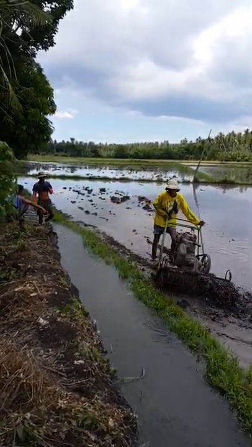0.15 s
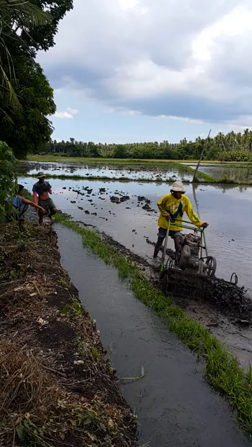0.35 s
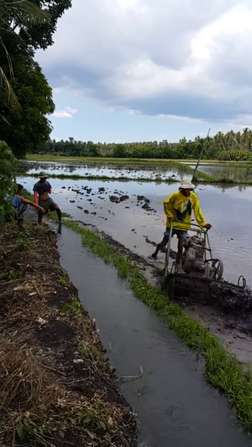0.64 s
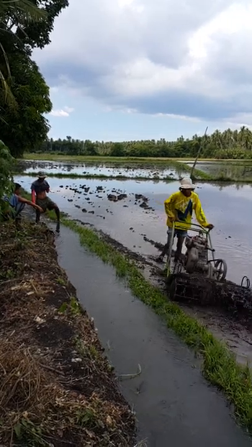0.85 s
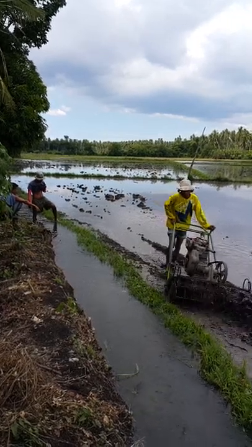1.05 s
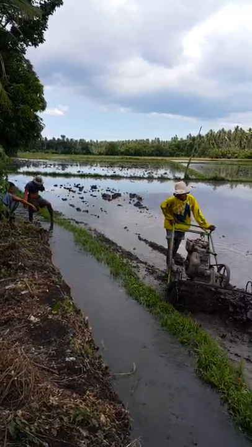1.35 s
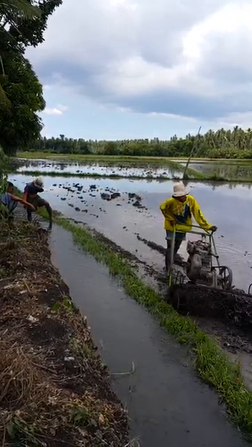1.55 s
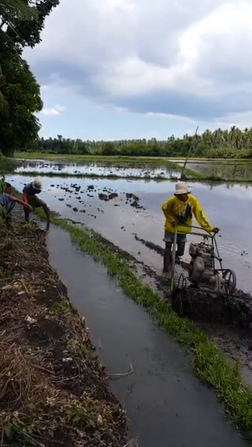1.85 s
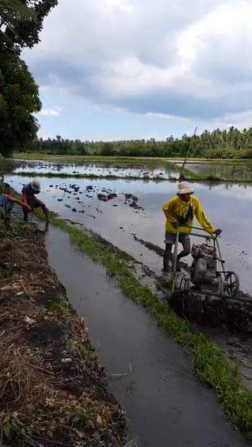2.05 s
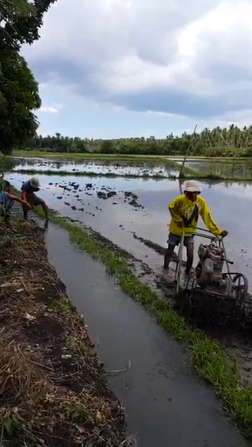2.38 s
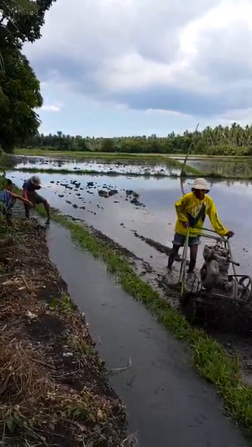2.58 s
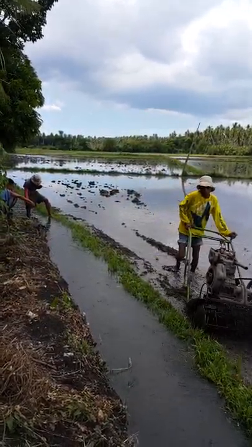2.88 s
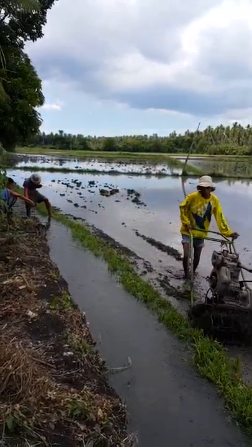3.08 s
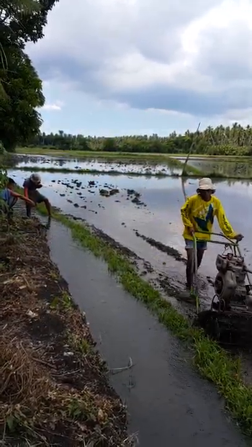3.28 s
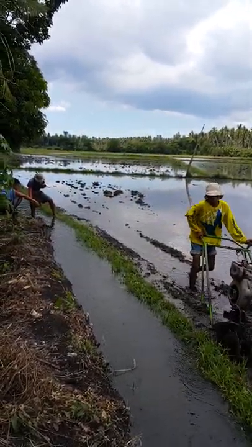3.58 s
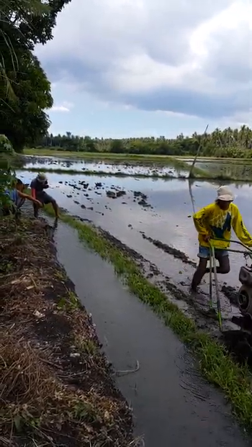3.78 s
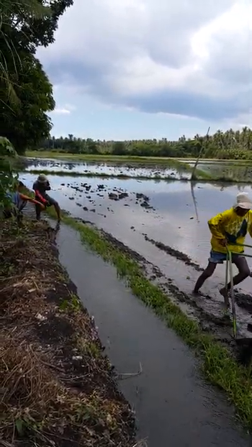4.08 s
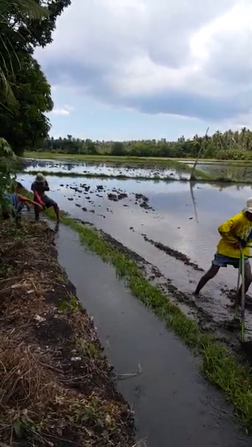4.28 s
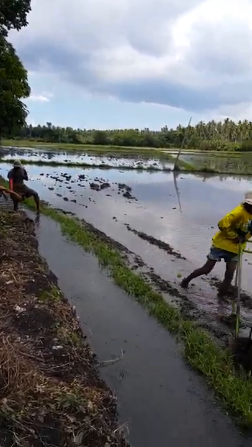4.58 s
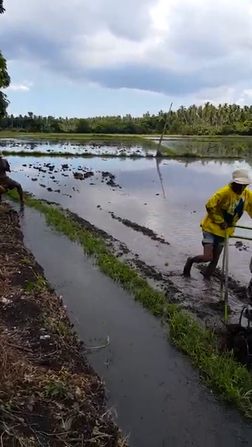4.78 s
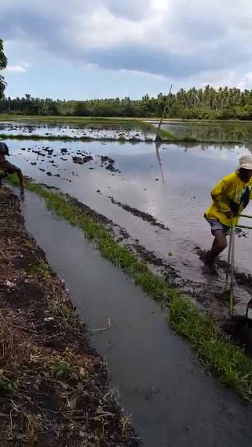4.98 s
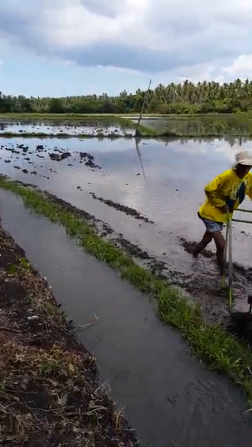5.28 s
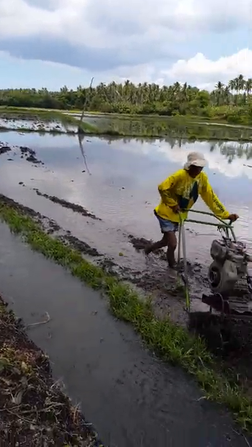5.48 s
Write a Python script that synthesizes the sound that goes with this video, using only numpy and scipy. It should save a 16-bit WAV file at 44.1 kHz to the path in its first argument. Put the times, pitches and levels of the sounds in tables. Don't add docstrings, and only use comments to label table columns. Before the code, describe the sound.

Fast, regular putt-putt of a tiller engine some metres from a phone, already running at the start and still running at the end. Crisp exhaust bursts sit on a pipe-like thud, with ringing muffler metal and a constant rattle filling the gaps. The pace drifts only slightly with load; the sound swells near the end. Dry open air, a faint short reflection off water, the two channels differently coloured.

```python
import sys
import numpy as np
from scipy import signal
from scipy.fft import rfft, irfft, next_fast_len
from scipy.io import wavfile
from scipy.ndimage import map_coordinates

SR = 44100
rng = np.random.default_rng(int(sys.argv[2]) if len(sys.argv) > 2 else 0)


def master_out(mix):
    frames = np.transpose(np.atleast_2d(mix))
    ceiling = np.clip(frames, -1, 1)
    pcm = np.round(ceiling * 32767).astype(np.int16)
    wavfile.write(sys.argv[1], SR, pcm)


def rack_gain(trim_db):
    fader = np.asarray(trim_db, float)
    return 10 ** (fader / 20)


N = 248283


def along(points, hz):
    f, v = np.transpose(points)
    return np.interp(np.log(hz + 1), np.log(f + 1), v)


def following(points, t):
    return np.interp(t, *np.transpose(points))


def clock():
    return np.arange(N) / SR


def unit(x):
    return x / np.sqrt(np.mean(x ** 2))


def filtered(x, response):
    m = next_fast_len(N + SR // 4)
    return irfft(rfft(x, m) * response(np.fft.rfftfreq(m, 1 / SR)), m)[..., :N]


def colour(points):
    return lambda hz: rack_gain(along(points, hz))


def modes(table):
    def response(f):
        return sum(sign * rack_gain(db) * 1j * f * width / (centre * centre - f * f + 1j * f * width)
                   for centre, width, db, sign in table)
    return response


def wobble(rate):
    knots = rng.standard_normal(int(N * rate / SR) + 4)
    return map_coordinates(knots, [np.arange(N) * rate / SR])


def gas(response):
    return unit(filtered(rng.standard_normal((2, N)), response))


# (time [s], rate [firings/s])
FIRING_RATE = [(0, 16.387), (.56, 16.585), (1.08, 16.72), (2.07, 16.59), (2.49, 16.273), (2.84, 16.348),
               (3.3, 16.104), (3.88, 16.545), (4.38, 16.364), (5.01, 16.851), (5.63, 16.674)]


def firings():
    first_s = .0279
    t = np.arange(N + SR // 10) / SR
    cycles = np.cumsum(following(FIRING_RATE, t)) / SR
    cycles = cycles - np.interp(first_s, t, cycles)
    whole = np.arange(int(cycles[N]) + 1)
    return np.interp(whole, cycles, t)


def crank():
    s = firings() - .0008
    s = np.concatenate([[2 * s[0] - s[1]], s, [2 * s[-1] - s[-2]]])
    t = clock()
    last = np.searchsorted(s, t, "right") - 1
    since = t - s[last]
    return np.clip(last - 1, 0, None), since, since / np.diff(s)[last]


# (time [s], nearness [dB])
NEARNESS = [(0, -3.5), (.66, -3.5), (2.0, -3), (2.8, -1.5), (3.2, -1), (3.7, -0.2), (4.1, -0.8), (4.6, 0.5),
            (5.15, 2.5), (5.63, 0.3)]
# (time [s], brightness [dB])
MOUTH_SWING = [(0, -0.7), (1.5, 0.7), (2.2, -0.7), (3, -0.15), (3.6, 0), (4.2, 3.2), (4.6, -1.2),
               (5.2, -1.2), (5.63, -4.3)]


def level(part, t):
    db, per_near, per_mouth = part
    return db + per_near * following(NEARNESS, t) + per_mouth * following(MOUTH_SWING, t)


def puff(t, rise, hold, fall_db):
    onset = 1 - np.exp(-(np.clip(t, 0, None) / rise) ** 2)
    return onset * rack_gain(-fall_db * np.clip(t - hold, 0, None))


def bursts(shape, db, spectrum, last):
    noise = gas(colour(spectrum))
    energy = np.bincount(last, shape ** 2 * noise[0] ** 2) / np.bincount(last, shape ** 2)
    return (rack_gain(db) / np.sqrt(energy))[last] * shape * noise


def strikes(s, db):
    return np.bincount(np.round(s * SR).astype(int), rack_gain(db), N + SR)[:N]


# (frequency [Hz], width [Hz], level [dB], sign)
PIPE_MODES = [(113, 38, 38.7, 1), (146, 54, 32, -1), (475, 180, 14, -1), (732, 240, 11.4, 1),
              (875, 140, 18, -1)]


def pipe(s, push_db):
    return filtered(strikes(s + 0.00036, push_db), modes(PIPE_MODES))


# (frequency [Hz], width [Hz], level [dB], sign)
CHAMBER_MODES = [(249, 13, 13, -1), (271, 58, 32, -1), (276, 33, 30, 1)]
# (time [s], level [dB])
CHAMBER_FACING = [(0, 1), (2.4, -2), (2.8, -5), (3.7, -2), (4.1, -2.5), (5.63, -1.5)]


def chamber(s, push_db):
    return filtered(strikes(s + 0.00037, push_db + following(CHAMBER_FACING, s)), modes(CHAMBER_MODES))


# (time after firing [s], level [dB])
RETURNING_WAVE = [
    (.015, -0.5),
    (.031, -14),
]
# (frequency [Hz], width [Hz], level [dB], sign)
SHELL_RING_MODES = [(910, 85, 28, 1), (918, 82, 27.6, -1)]


def returning_wave(s):
    back = 0
    for late, db in RETURNING_WAVE:
        jitter_s = 0.000043 * rng.standard_normal(len(s))
        scatter_db = 5.7 * rng.standard_normal(len(s))
        back = back + strikes(s + late + jitter_s, db + 1.0 + scatter_db)
    return filtered(back, modes(SHELL_RING_MODES))


def thump():
    s = firings()
    s = s + .00025 * rng.standard_normal(len(s))
    push_db = 1.5 + .7 * rng.standard_normal(len(s))
    ringing = pipe(s, push_db) + chamber(s, push_db) + returning_wave(s)
    return ringing * [[1], [.3]]


# (time [s], frequency of a reinforced crest [Hz])
WATER_CREST = [(0, 1900), (1.5, 1780), (3, 1746), (3.6, 1417), (4.3, 1493), (5.63, 1360)]


def off_water(x, delay, share):
    turn = 2 * np.pi * delay * following(WATER_CREST, clock())
    analytic = signal.hilbert(x, next_fast_len(N))[:, :N]
    echo = np.roll(analytic, round(delay * SR), axis=1)
    return x + share * (echo * np.exp(1j * turn)).real


# (frequency [Hz], level [dB per Hz])
HIGH_BLAST = [(2400, -13), (3300, 0), (5000, 0.5), (9000, -0.5), (15700, -1.5), (16200, -45), (16800, -39)]
# (frequency [Hz], level [dB per Hz])
MIDDLE_BLAST = [(900, -148), (1300, -2), (2200, -0.5), (2800, 1), (3600, -15.5)]


def exhaust():
    last, since, _ = crank()
    s = firings()
    high_db = level((-9, 0.21, 0.58), s) + .6 * rng.standard_normal(len(s))
    mid_db = level((-16, 0.2, -0.97), s) + 1.5 * rng.standard_normal(len(s))
    hold = 0.0018 + .00025 * following(NEARNESS, clock())
    high = bursts(puff(since, rise=0.00074, hold=hold, fall_db=3600), high_db, HIGH_BLAST, last)
    mid = bursts(puff(since, rise=0.00022, hold=0.0014, fall_db=3300), mid_db, MIDDLE_BLAST, last)
    front_s, front_scattered, tail_scattered = .0018, .5, 1.1
    front = np.exp(-(since / front_s) ** 2)
    scattered = tail_scattered + (front_scattered - tail_scattered) * front
    blast = (high + mid) * [np.ones(N), scattered]
    return off_water(blast, delay=.00143, share=.6) + thump()


# (frequency [Hz], level [dB per Hz])
GUST_COLOUR = [(30, 7), (70, 14), (150, 4), (300, -3), (420, -6.5), (550, -3.5), (800, -6), (1600, -14.5)]


def gust():
    last, since, _ = crank()
    s = firings()
    low_db = level((-21, 0.1, 0.09), s) + 3 * rng.standard_normal(len(s))
    shape = puff(since, rise=0.0013, hold=0.0053, fall_db=2500)
    left, right = bursts(shape, low_db, GUST_COLOUR, last)
    right_db, shared = 6, 0.28
    return np.array([left, rack_gain(right_db) * (right + shared * left)])


# (frequency [Hz], level [dB per Hz])
RATTLE_COLOUR = [(30, -15), (60, 14.5), (130, 8.5), (250, 5.5), (420, -10), (800, 0.5), (1200, -6.5),
                 (2200, -8.5), (3200, -5), (5500, -4.5), (9000, -1), (15600, -9), (15900, -50)]
# (frequency [Hz], level [dB per Hz])
HISS_COLOUR = [(3500, -5), (4800, -5), (5800, 9), (7000, -4), (9000, -19)]


def rattle():
    _, since, _ = crank()
    t = clock()
    fading = 1 + 1.84 * rack_gain(-250 * since) + 0.28 * rack_gain(-1500 * since)
    unsteady_db = 1.2 * wobble(150) + 1.3 * wobble(45)
    loose = rack_gain(level((-31, 0.44, 0.057), t) + unsteady_db) * gas(colour(RATTLE_COLOUR))
    hiss = rack_gain(level((-44, 2.15, 1.4), t) + 0.67 * wobble(60)) * gas(colour(HISS_COLOUR))
    return fading * (loose + hiss)


def knocks(table, share, scatter_db):
    cycle = np.cumsum(np.diff(share, prepend=1) < 0)
    size = rack_gain(scatter_db * rng.standard_normal((len(firings()) + 2, len(table))))
    swell = 1
    for k, (at, width, db) in enumerate(table):
        swell = swell + rack_gain(db) * size[cycle, k] * np.exp(-((share - at) / width) ** 2)
    return swell


# (frequency [Hz], width [Hz], level [dB], sign)
SHELL_MODES = [(790, 100, -7, 1), (905, 24, 1, -1)]
# (place [share of cycle], width [share of cycle], level [dB])
SHELL_SWELLS = [(.3, 0.1, 6), (.55, 0.079, 3), (.82, 0.027, 2)]


def shell():
    swell = knocks(SHELL_SWELLS, crank()[2], scatter_db=2.5)
    return rack_gain(level((-47, 1.8, .1), clock())) * swell * gas(modes(SHELL_MODES))


# (frequency [Hz], width [Hz], level [dB], signed factor)
HEAD_MODES = [(1447, 110, 14, 1), (1916, 175, 10, -1.2), (2920, 45, -42, -0.66)]
# (place [share of cycle], width [share of cycle], level [dB])
VALVE_SWELLS = [(.27, .05, -3), (.84, .055, 3)]


def valves():
    swell = knocks(VALVE_SWELLS, crank()[2], scatter_db=2)
    return rack_gain(level((-43, 0.78, -.3), clock())) * swell * gas(modes(HEAD_MODES))


def casing():
    return filtered(rattle() + shell() + valves(), lambda hz: hz < 15850)


# (time [s], peak level [dB])
WHEEL_CLANKS = [
    (4.5413, -19),
]
# (frequency [Hz], level [dB per Hz])
CLANK_COLOUR = [(1500, -25), (3500, -13), (5500, 9), (9000, -1), (15600, -14), (15900, -50)]


def wheels():
    t = clock()
    shape = sum(rack_gain(db + 1) * puff(t - s, rise=.0012, hold=.004, fall_db=2500) for s, db in WHEEL_CLANKS)
    return shape * gas(colour(CLANK_COLOUR))


# (frequency [Hz], likeness [0-1])
LIKENESS = [(30, 1), (80, 1), (400, 1), (950, 0.87), (1500, 1), (2800, 0.44), (5000, 0.43), (9000, 0.046)]
# (frequency [Hz], phase [radians])
LEFT_LAG = [(60, .45), (250, .5), (860, .85), (2000, 1.3), (3000, 2.1), (5500, 2.9), (12000, 3.4)]


def scene():
    def shares(hz):
        turn = np.arccos(np.clip(along(LIKENESS, hz), -1, 1)) / 2
        return np.array([np.cos(turn), np.sin(turn)])

    def lag(hz):
        return np.exp(np.outer([-.5j, .5j], along(LEFT_LAG, hz)))

    direct, scattered = filtered(exhaust() + casing() + wheels(), shares)
    return filtered(np.array([direct + scattered, direct - scattered]) + gust(), lag)


def low_pass(x):
    return signal.sosfilt(signal.butter(12, 16810, fs=SR, output="sos"), x)


# (frequency [Hz], gain [dB])
LEFT_MIC = [(40, 10), (70, 4), (200, -3.5), (390, 3), (550, -1), (900, 1.5), (1100, -3), (2400, 4.5),
            (4000, -3.5), (6000, -12), (7500, -14.5), (11000, -21), (16000, -23)]
# (frequency [Hz], gain [dB])
RIGHT_MIC = [(35, 8.5), (70, -2.5), (300, 0.5), (2000, 3), (4000, 5.5), (5700, 7.5), (6500, 2.5),
             (7400, -14.5), (9000, -19), (10800, -13.5), (12300, -7.5), (16000, -9.5)]


def record(dry):
    def mics(hz):
        bass_cut = (1j * hz / (232 + 1j * hz)) ** 2
        return rack_gain([along(LEFT_MIC, hz), along(RIGHT_MIC, hz)]) * bass_cut * (hz < 16800)

    x = filtered(dry, mics)
    x = x / (1 + np.abs(x / 1.15) ** 4) ** (1 / 4)
    x = np.clip(x, -1, 1)
    x = filtered(x, colour([(15800, 0), (16000, -6), (16780, -12), (16820, -80)]))
    return low_pass(x)


dry = scene()
out = record(dry)
master_out(out)
```